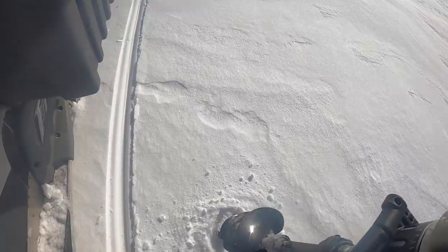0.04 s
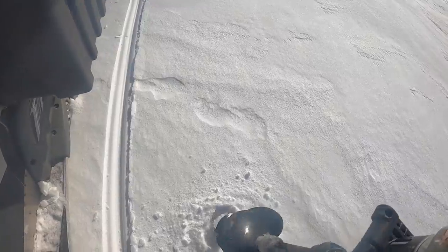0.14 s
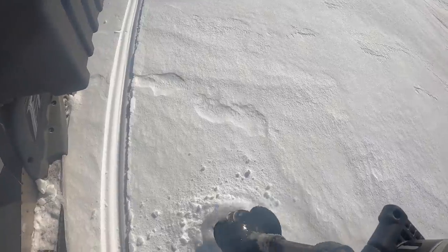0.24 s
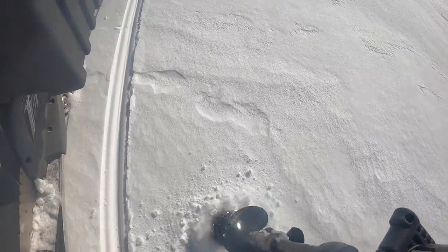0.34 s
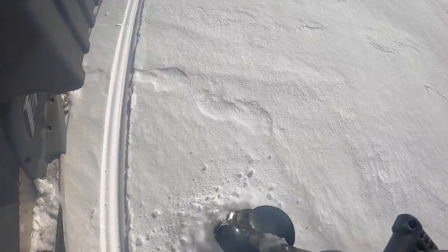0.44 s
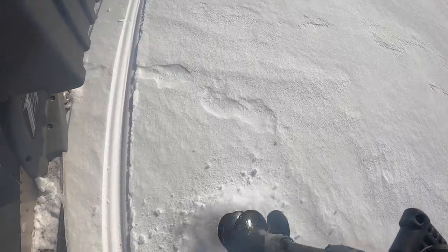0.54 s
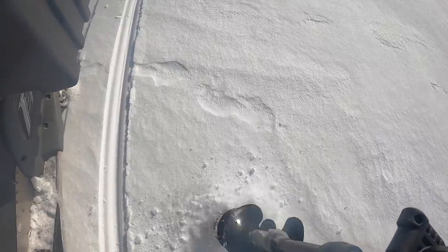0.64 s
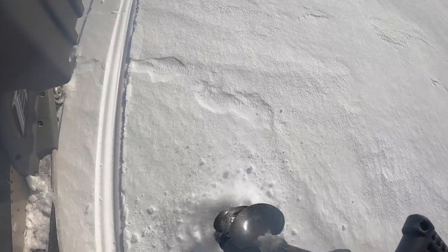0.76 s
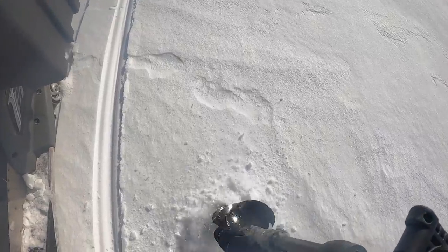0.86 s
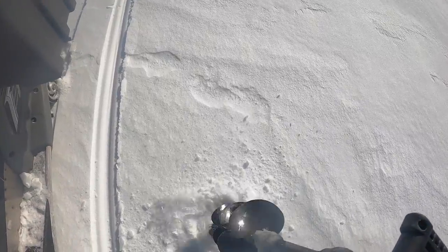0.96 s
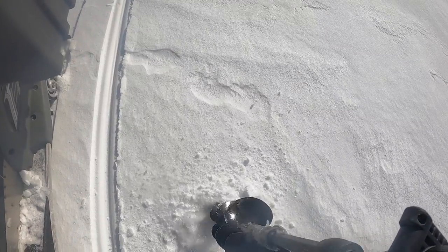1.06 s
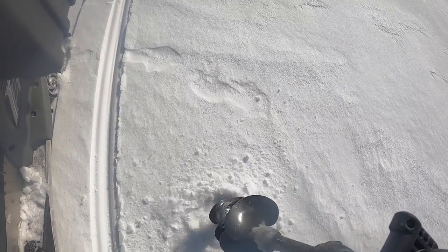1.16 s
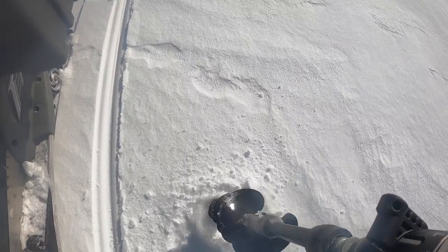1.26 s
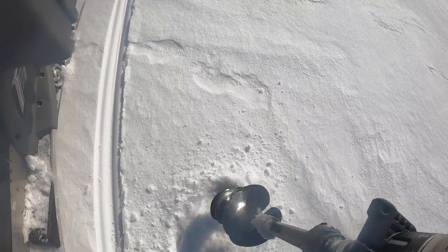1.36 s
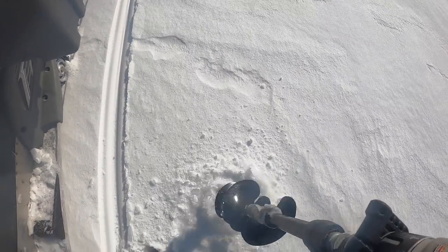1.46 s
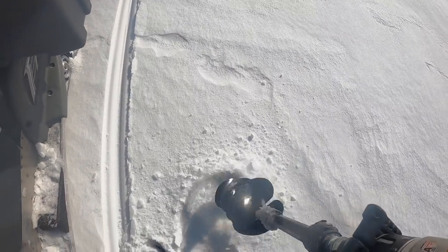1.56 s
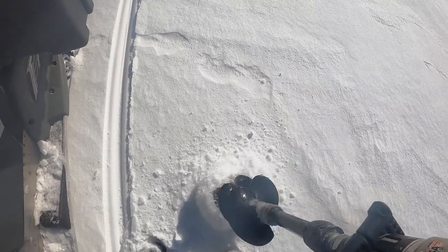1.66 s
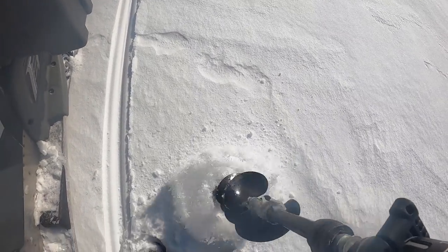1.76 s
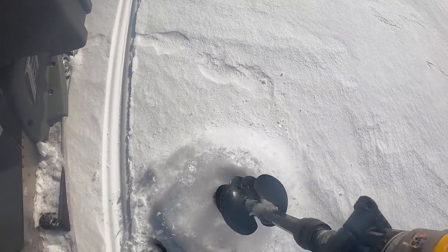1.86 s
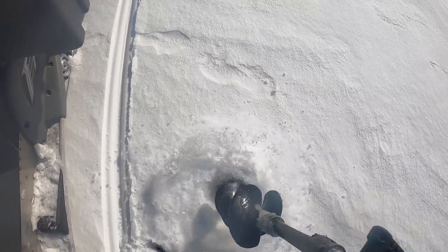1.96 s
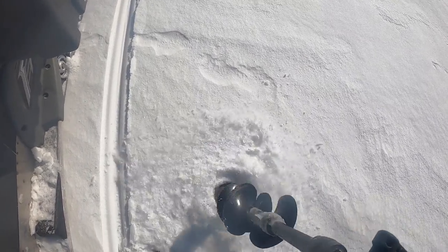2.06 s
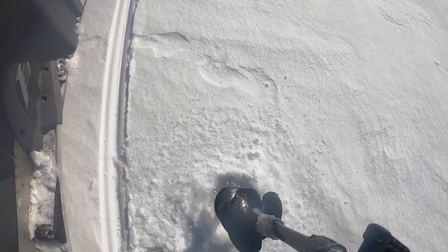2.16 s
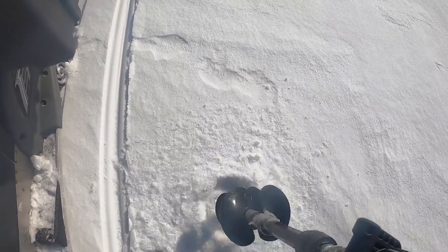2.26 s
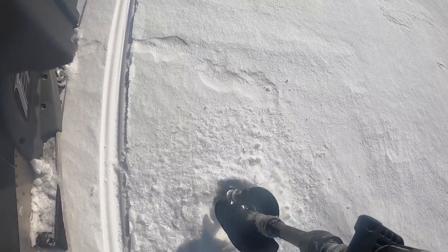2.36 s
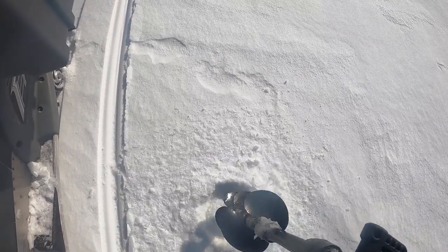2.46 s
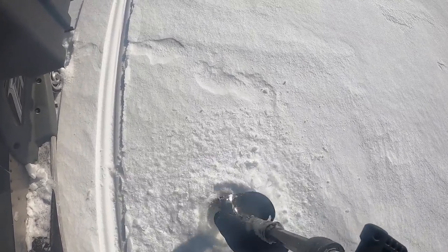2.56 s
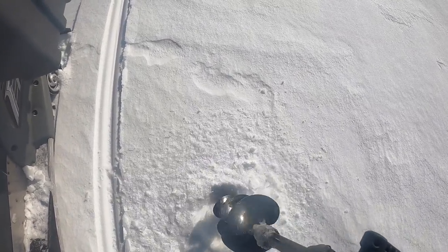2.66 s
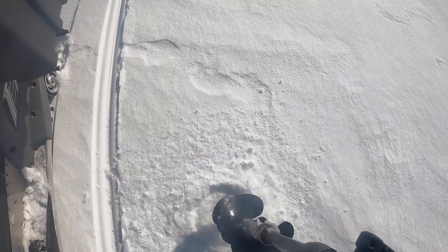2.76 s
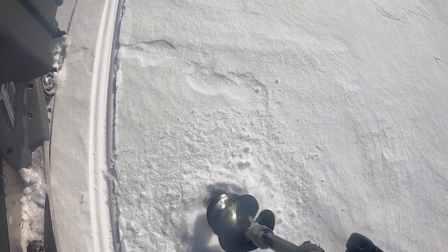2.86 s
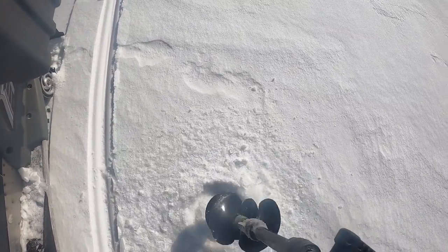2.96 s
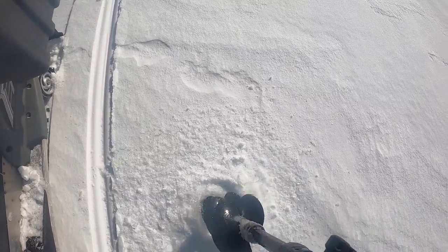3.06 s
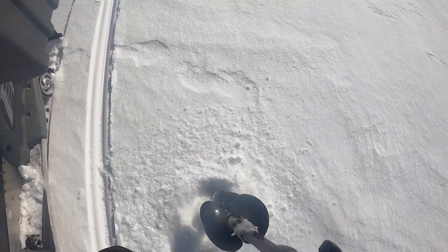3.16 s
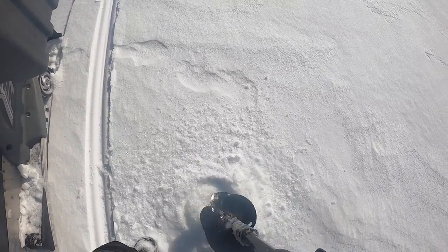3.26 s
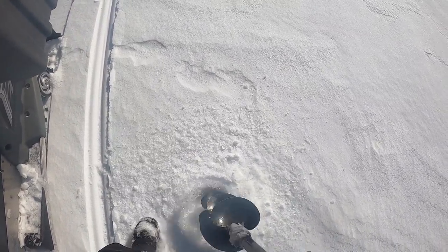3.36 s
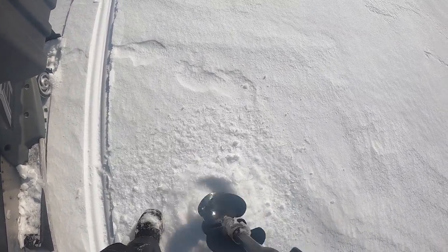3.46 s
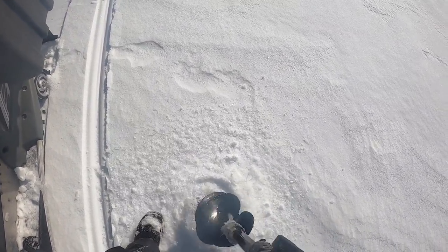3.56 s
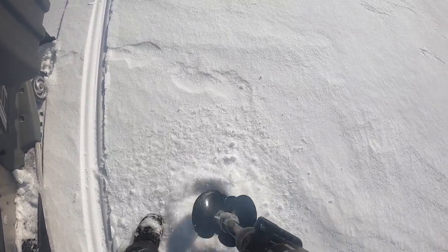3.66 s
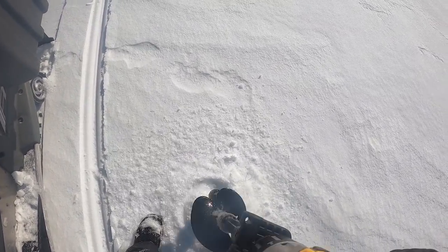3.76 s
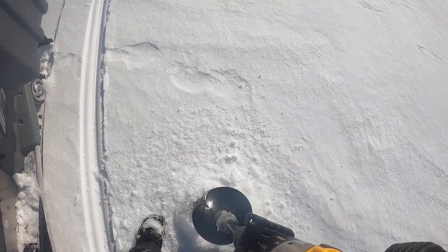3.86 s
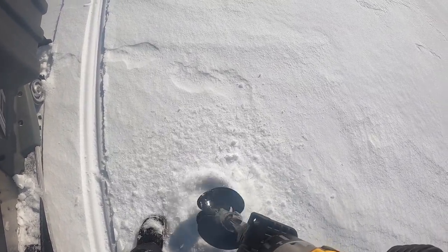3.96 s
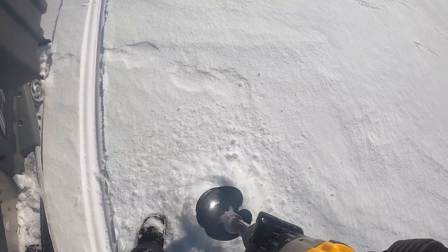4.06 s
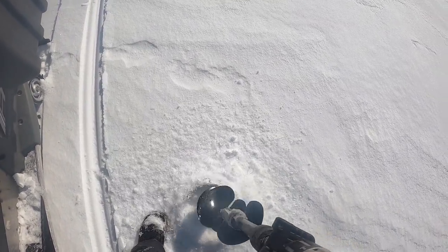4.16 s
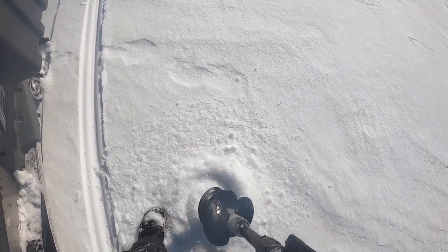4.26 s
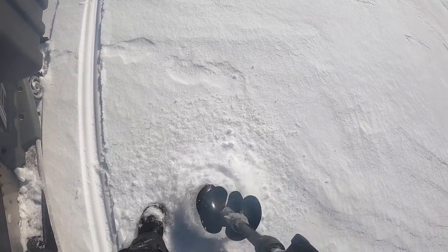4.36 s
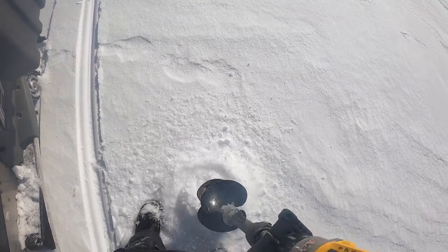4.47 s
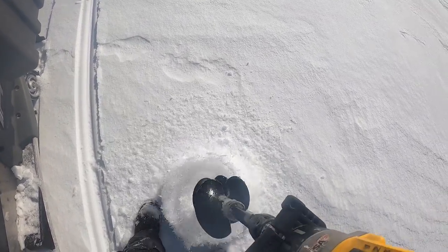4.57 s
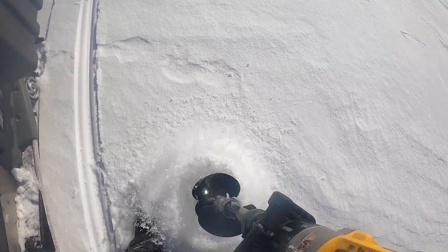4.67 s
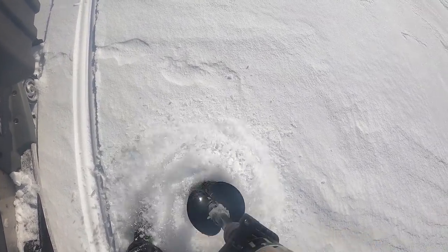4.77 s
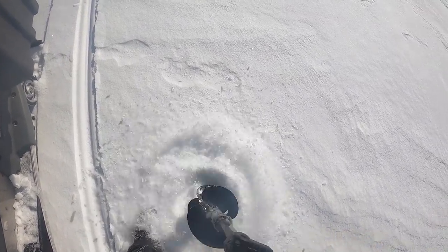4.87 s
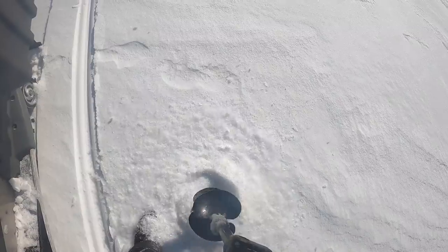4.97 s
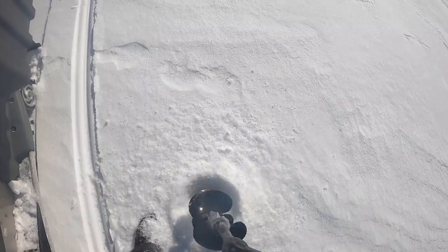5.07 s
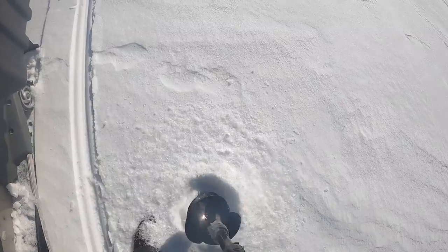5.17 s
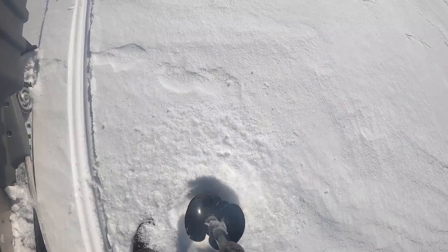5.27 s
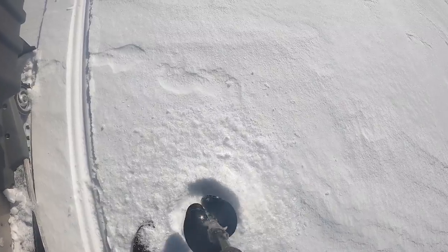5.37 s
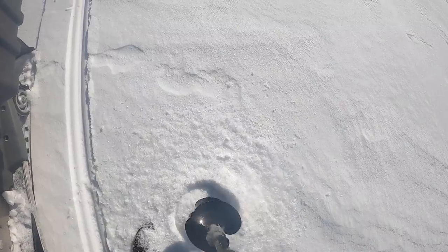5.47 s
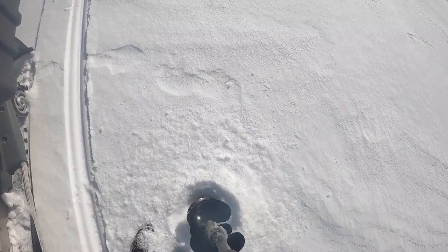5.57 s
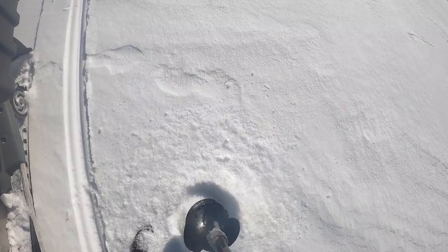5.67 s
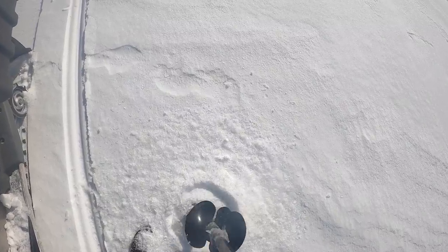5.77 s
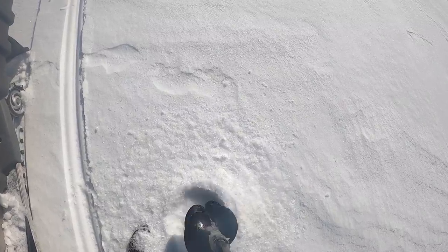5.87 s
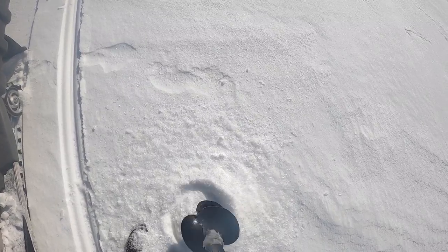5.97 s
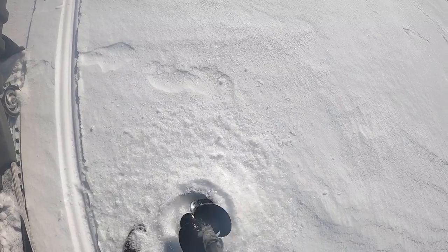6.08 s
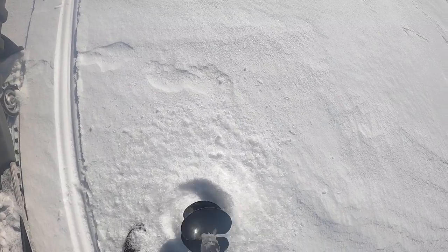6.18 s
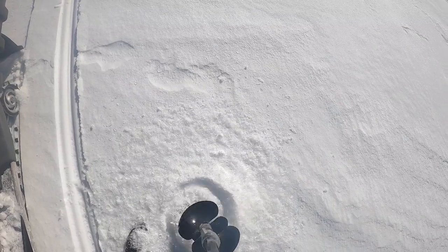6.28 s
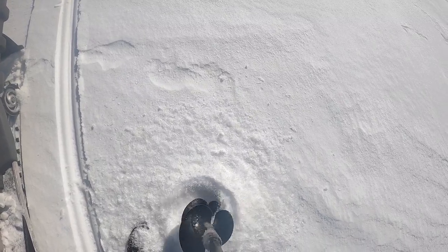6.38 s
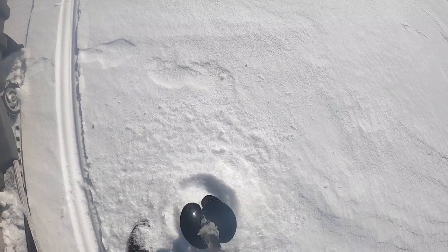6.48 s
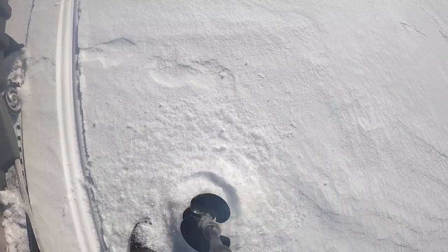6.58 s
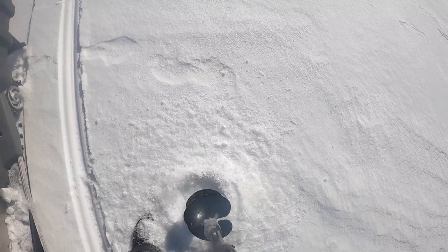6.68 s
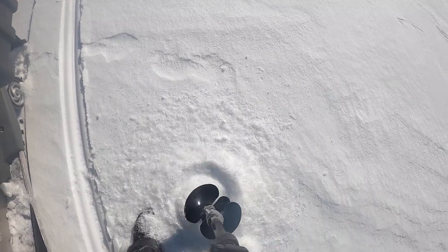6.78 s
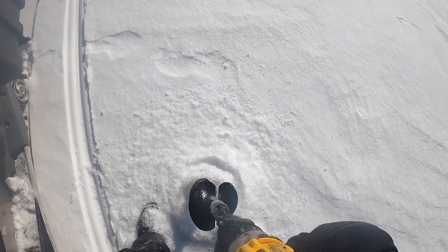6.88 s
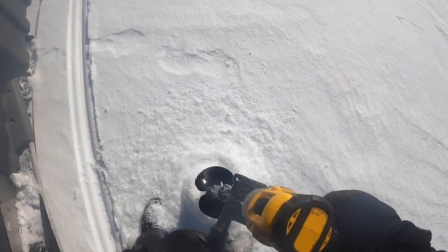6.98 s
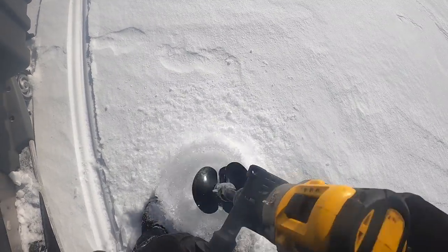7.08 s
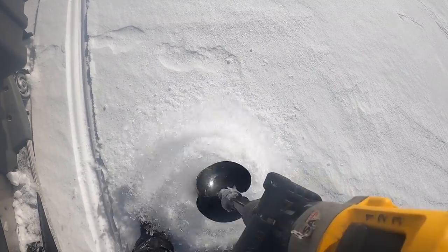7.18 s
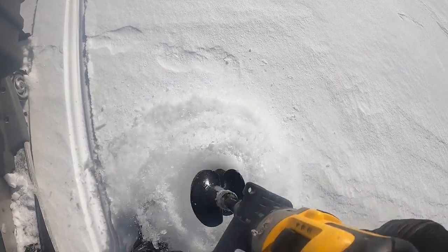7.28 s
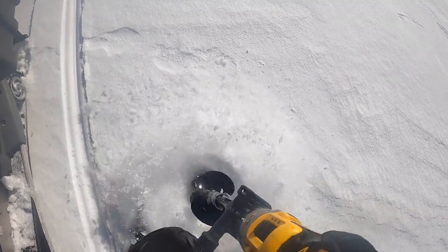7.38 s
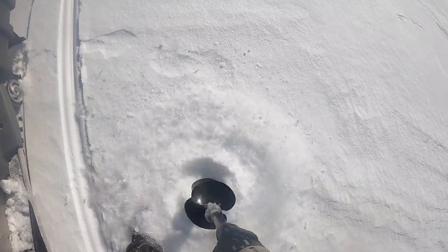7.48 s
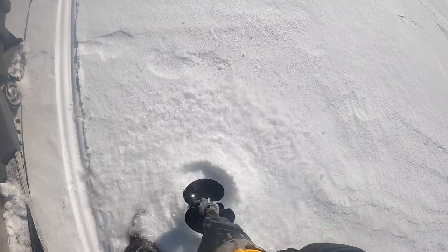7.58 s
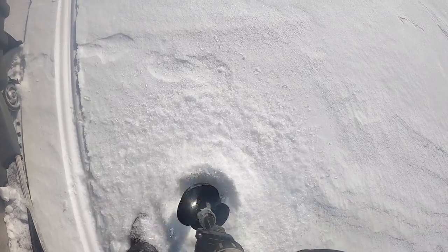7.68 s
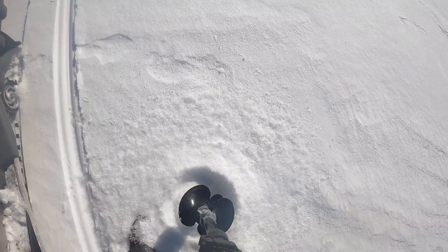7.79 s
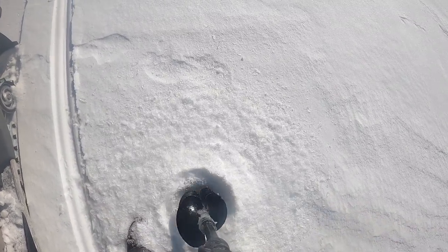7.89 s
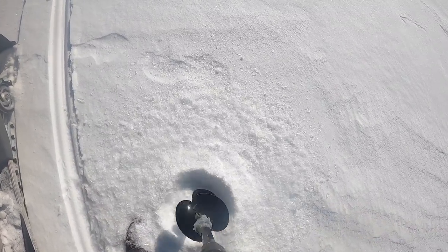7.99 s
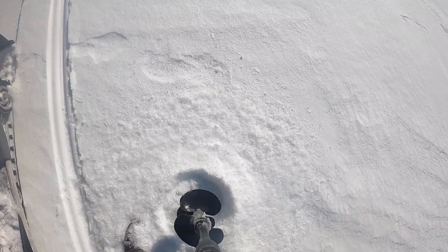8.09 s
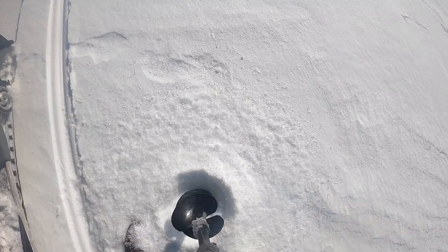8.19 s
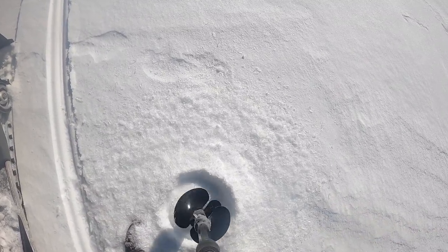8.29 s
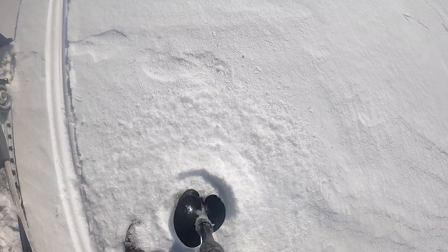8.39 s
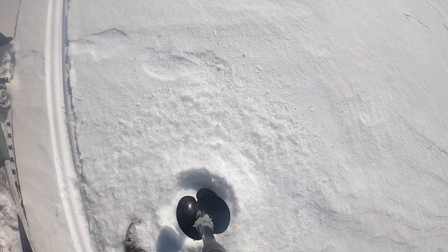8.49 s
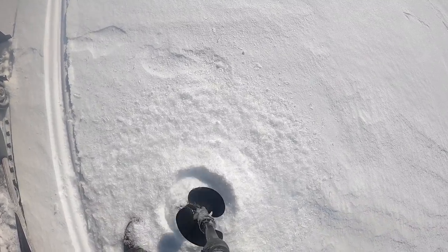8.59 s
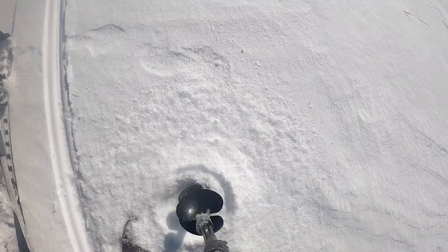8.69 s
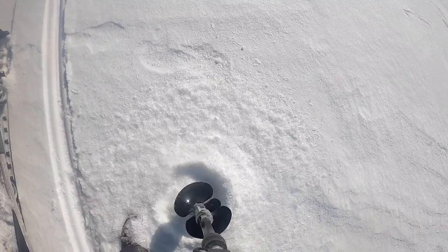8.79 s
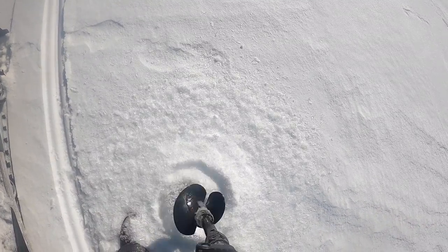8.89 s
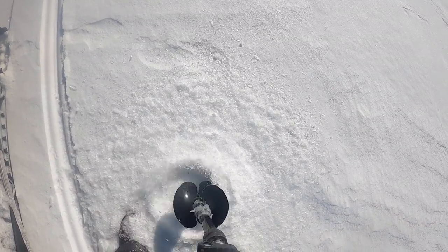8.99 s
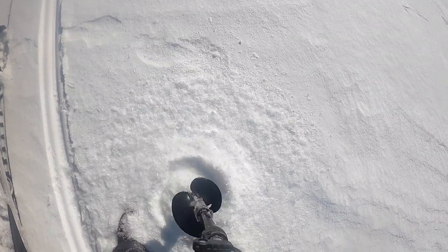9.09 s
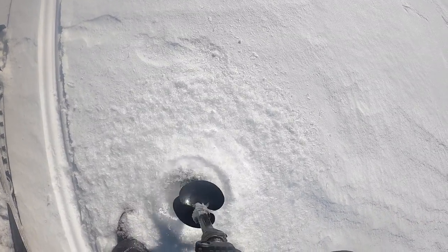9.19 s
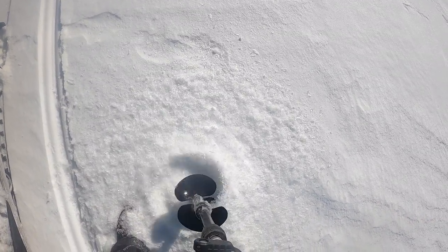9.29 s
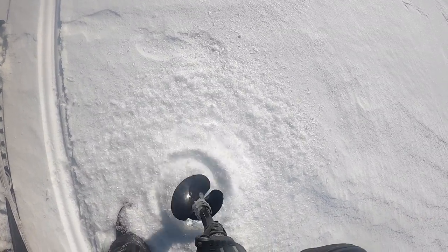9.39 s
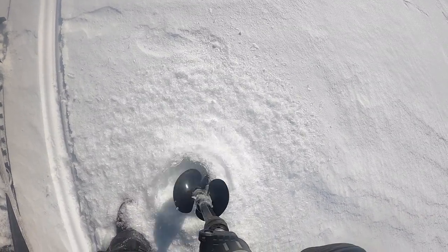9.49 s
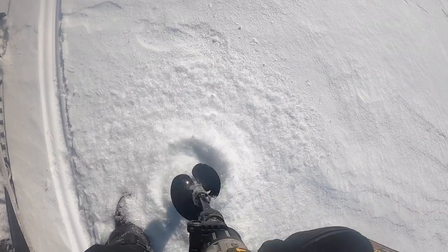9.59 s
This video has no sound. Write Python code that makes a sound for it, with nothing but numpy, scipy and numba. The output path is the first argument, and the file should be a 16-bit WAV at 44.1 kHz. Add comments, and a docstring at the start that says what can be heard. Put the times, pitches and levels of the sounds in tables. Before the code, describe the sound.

A gust of wind and small metal clacks, then a cordless drill surges up close, whining and rattling as its auger grinds into lake ice.

```python
"""A gust of wind and small metal clacks come first, then a cordless drill surges up close by and augers into lake ice.
Its gear tones whine over a rattling housing, sag under load and jump whenever the blades slip.
Three times the auger is lifted and spins free. Grains of noise make scraping blades and wet slush;
decaying sines make thuds and chuck clacks, and filtered noise makes the wind."""
import sys
import numpy as np
from scipy import signal
from scipy.fft import rfft
from scipy.io import wavfile
from scipy.ndimage import uniform_filter1d, map_coordinates
from numba import njit

SR = 44100
rng = np.random.default_rng(int(sys.argv[2]) if len(sys.argv) > 2 else 0)


def wav_out(sig):
    """Save sig, one row per channel (or a flat mono array), as 16-bit PCM at SR to the path in sys.argv[1]."""
    wavfile.write(sys.argv[1], SR, np.round(np.clip(np.atleast_2d(sig).T, -1, 1) * 32767).astype(np.int16))


N = 425124
T = np.arange(N) / SR
# the motor starts, then the shaft engages; free-running speed in motor turns per second
START_S, ENGAGE_S, FREE_HZ = 0.22, 0.268, 510.6


def undb(db):
    """Decibels to gain."""
    return 10 ** (np.asarray(db) / 20)


def unit(x):
    """Scale to rms 1."""
    return x / np.sqrt(np.mean(x ** 2))


def curves(table):
    """Each column of a table as a control over time."""
    s, *columns = np.transpose(table)
    return [np.interp(T, s, column) for column in columns]


def ramp(s, rise_s):
    """A smooth step from 0 to 1 around time s."""
    return (1 + np.tanh((T - s) / (2 * rise_s))) / 2


def walk(rate):
    """Smooth chance of rms 1 that changes about rate times a second."""
    k = max(int(SR / rate), 1)
    smooth = uniform_filter1d(rng.standard_normal(N), k)
    return unit(uniform_filter1d(smooth, k))


def grains(rate, scatter_db):
    """Dense tiny impacts of uneven size, rate of them a second."""
    hits = rng.random(N) < rate / SR
    signs = np.sign(rng.standard_normal(N))
    sizes = undb(scatter_db * rng.standard_normal(N))
    return unit(hits * signs * sizes)


def shape(x, points):
    """Filter by an outline of (frequency [Hz], level [dB])."""
    hz, db = np.transpose(points)
    f = np.fft.rfftfreq(N, 1 / SR) + 1
    gain = undb(np.interp(np.log(f), np.log(hz), db))
    return np.fft.irfft(np.fft.rfft(x) * gain, N)


@njit
def band(x, hz, width):
    """State-variable band-pass whose centre may move."""
    y, b, l = np.empty(len(x)), 0., 0.
    for i in range(len(x)):
        w = np.pi * hz[i] / SR
        g = np.tan(w)
        k = width / hz[i] * 2 * w / np.sin(2 * w)
        v = (b + g * (x[i] - l)) / (1 + g * (g + k))
        b, l, y[i] = 2 * v - b, l + 2 * g * v, k * v
    return y


def fixed_band(x, hz, width):
    """Band-pass with a centre that stays put."""
    return band(x, np.full(len(x), float(hz)), float(width))


# wind gusts: (time [s], rise [dB], half length [s])
WIND_GUSTS = [(0.077, 7.5, 0.13), (1.202, 3.5, 0.17), (2.7, 4, .22)]
# colour of the wind on the microphone: (frequency [Hz], relative level [dB])
WIND_COLOUR = [(15, -2), (48, -6), (80, -17.5), (140, -23), (300, -28.5), (1000, -33.5), (3400, -31),
               (4500, -37), (16000, -55)]


def wind(db=-36.0, buffet_db=2):
    """Low buffeting with a faint hiss, from shaped noise that swells in a few gusts."""
    gust_db = sum(rise_db * np.exp(-((T - s) / half_s) ** 2) for s, rise_db, half_s in WIND_GUSTS)
    noise = unit(shape(rng.standard_normal(N), WIND_COLOUR))
    return noise * undb(db + gust_db + buffet_db * walk(21.0))


# slush and chips landing: (time [s], relative level [dB], centre [Hz], decay [s])
SPLATS = [(1.925, -19.5, 890, 0.0097), (1.967, -17.5, 804.6, 0.017), (4.662, -22, 194, 0.01),
          (4.79, -22.5, 191, 0.055), (4.808, -10, 786, 0.012), (5.06, -19, 370, 0.013),
          (5.314, -18, 420, 0.0095), (5.58, -24.5, 328, 0.011), (7.18, -22.5, 130, 0.014),
          (7.395, -21.5, 191, 0.054), (7.398, -10, 676, .007), (7.418, -18, 720, 0.026),
          (7.447, -15, 710, .018), (8.173, -20, 260, 0.0088)]


def slush(spread=1.77, attack_s=0.0029):
    """Slush lands as wet splats: short bursts of grains, each in a broad band."""
    out, spray = np.zeros(N), grains(rate=3200, scatter_db=3.0)
    age = T[:SR // 7]
    envelope_rise = 1 - np.exp(-age / attack_s)
    for s, db, hz, decay_s in SPLATS:
        span = slice(int(s * SR), int(s * SR) + len(age))
        width = spread * hz
        splat = unit(fixed_band(fixed_band(spray[span], hz, width), hz, width))
        out[span] += undb(db) * 2 * splat * envelope_rise * np.exp(-age / decay_s)
    return out


# lumps thudding close to the microphone: (time [s], level [dB], frequency [Hz], decay [s])
LUMPS = [(1.976, -15, 60, 0.014), (4.839, -6, 116, 0.0086), (7.496, -12, 66.3, 0.011),
         (9.46, -17, 90.2, 0.012)]


def thuds():
    """Heavy lumps land as short low sines that die away."""
    out, age = np.zeros(N), T[:SR // 7]
    for s, db, hz, decay_s in LUMPS:
        start = int(s * SR)
        out[start:start + len(age)] += undb(db) * np.sin(2 * np.pi * hz * age) * np.exp(-age / decay_s)
    return out


# pushes into the ice: (blades bite [s], auger lifted [s], loaded speed [motor turns/s], time to sag [s],
# first slip [s], time between slips [s], typical leap at a slip [motor turns/s], gearbox level [dB],
# vent level [dB], fifth gear order against sixth [dB], whine level [dB], scraping level [dB])
PUSHES = [(.54, 1.649, 321.6, .16, 1, .121, 36, -6, -3, -3, -1, -23),
          (1.985, 4.499, 342.2, .055, 2.19, .122, 29.97, -2, -3, -2, .5, -24.5),
          (4.83, 7.02, 324.3, .035, 4.991, .1242, 53.97, 2, -4, 1, 0, -25.5),
          (7.485, 9.8, 335.1, .036, 7.634, .1215, 23, 2, -2.5, -1, -0.9, -26)]


def per_push():
    """Loaded speed, gearbox, vents, order balance, whine, scraping: held in a push, gliding between."""
    pushes = np.array(PUSHES)
    edges_s = pushes[:, :2].ravel()
    columns = (pushes[:, 2], *pushes[:, 7:].T)
    return [np.interp(T, edges_s, np.repeat(column, 2)) for column in columns]


def blade_load(creep_share=0.2, creep_s=0.25, release_s=0.019):
    """Load on the motor, 0-1: it builds as the blades bite and drops when the auger is lifted."""
    load = 0
    for bite_s, lift_s, _, sag_s, *_ in PUSHES:
        age = np.maximum(T - bite_s, 0)
        # the last share of the sag creeps in as the blades dig deeper
        grip = 1 - (1 - creep_share) * np.exp(-age / sag_s) - creep_share * np.exp(-age / creep_s)
        load = load + grip * (1 - ramp(lift_s, release_s))
    return np.clip(load, 0, 1)


def churn(load, cut_s, db=-36, hz=150, width_hz=170, full_after_s=3.8, patchy_db=4):
    """Lifted out of a deep hole, the spiral tumbles loose slush: low, lumpy, band-passed grains."""
    fill = np.minimum(cut_s / full_after_s, 1) * (1 - load) ** 2
    tumble = unit(fixed_band(grains(rate=500, scatter_db=1.5), hz, width_hz))
    return tumble * fill * undb(db + patchy_db * walk(30))


# colour of blades scraping ice: (frequency [Hz], relative level [dB])
SCRAPE_COLOUR = [(40, 2), (100, 3.5), (150, -3.5), (310, -5.5), (420, 0), (560, -1.5), (760, -0.5),
                 (1100, 1.5), (1400, -3), (2000, -1.5), (3200, -14), (8000, -14)]


def blades(load, cut_s, boom_hz=190, boom_width_hz=40, boom_db=-29.5, fade_db_per_s=1.12,
           boom_lifted_db=-11.5, patchy_db=1.8, attack_s=0.018, shallow_db=-1.0, deep_db=2.5, deep_after_s=5.9):
    """Ice chips off in dense grains that boom in the auger's spiral, less with every second of cutting."""
    scrape_db = per_push()[-1]
    # the lifted auger scrapes a little less over a shallow hole but rubs the wall of a deep one
    lifted_db = np.interp(cut_s, [0, deep_after_s], [shallow_db, deep_db])
    scrape = unit(shape(grains(rate=2500, scatter_db=3), SCRAPE_COLOUR))
    scrape = scrape * undb(scrape_db + lifted_db * (1 - load))
    boom = unit(fixed_band(grains(rate=900, scatter_db=1), boom_hz, boom_width_hz))
    boom = boom * undb(boom_db - fade_db_per_s * cut_s + boom_lifted_db * (1 - load))
    patches = undb(patchy_db * walk(26))
    return (scrape + boom) * patches * ramp(ENGAGE_S - attack_s, attack_s)


# the chuck takes up its slack: (time [s], relative level [dB])
CHUCK_HITS = [(.195, -26), (0.228, -18), (0.2455, 4), (4.841, -4.5), (7.4, -7)]
# what the struck chuck rings with: (frequency [Hz], relative level [dB], decay [s])
CHUCK_MODES = [(1025, -14.5, 0.011), (2080, -3.5, 0.0039), (4020, -3, .004), (5600, -8, .003),
               (7050, -21, 0.0017), (7400, -15, .003), (8600, -5, 0.0034), (11900, -10, 0.0024)]


def chuck(crack_db=-7, crack_s=0.0083, db=-2):
    """Slack metal clacks together: decaying modes under a short crack of noise."""
    out, age = np.zeros(N), T[:SR // 15]
    ring = 0
    for hz, mode_db, decay_s in CHUCK_MODES:
        ring = ring + undb(mode_db) * np.sin(2 * np.pi * hz * age) * np.exp(-age / decay_s)
    for s, hit_db in CHUCK_HITS:
        start = int(s * SR)
        crack = undb(crack_db) * rng.standard_normal(len(age)) * np.exp(-age / crack_s)
        out[start:start + len(age)] += undb(db + hit_db) * (ring + crack)
    return out


def squeak(start_s=0.273, length_s=0.021, hz=2600, db=-13):
    """The drive squeaks briefly as it takes hold: one sine under a half-sine swell."""
    swell = np.sin(np.pi * np.clip((T - start_s) / length_s, 0, 1))
    return undb(db) * swell * np.sin(2 * np.pi * hz * T)


def motor_speed(load, loaded_hz, steady, idle_hz=410, rise_s=.008, fall_s=.019, uneven=.2,
                waver_hz=2.2, wobble_hz=14, free_waver_hz=6):
    """The motor sags under load, leaps as the blades slip, and wavers; also how freely it runs, 0-1."""
    hz = idle_hz + (FREE_HZ - idle_hz) * ramp(ENGAGE_S + fall_s, rise_s) - (FREE_HZ - loaded_hz) * load
    free = np.clip((hz - 370) / 135, 0, 1) ** 1.512
    for _, lift_s, _, _, first_s, turn_s, leap_hz, *_ in PUSHES:
        slips = np.arange(first_s, lift_s, turn_s)  # once an auger turn
        for s, chance in zip(slips, rng.standard_normal(len(slips))):
            near = slice(int((s - .1) * SR), int((s + .2) * SR))
            age = T[near] - s
            side_s = np.where(age < 0, rise_s, fall_s)
            hz[near] += leap_hz * (1 + uneven * chance) * np.exp(-np.abs(age / side_s) ** 1.5)
    shake_hz = waver_hz + wobble_hz * (1 - steady) * (1 - free / 2)
    return hz + shake_hz * walk(64.94) + free_waver_hz * free * walk(14), free


# gear tones: (multiple of motor speed, relative level under load [dB],
# relative level running free [dB], roughness [0-1])
GEAR_TONES = [(2.49, -21.5, -30, 0.57), (2.994, -9, -13.5, 0.77), (3.65, -30, -17.5, 0.94),
              (4.973, -9, -46, 0.65), (6.01, -10, -13.5, 0.76), (7.46, -14, -24, 0.94),
              (10.01, -17.5, -26, 0.93), (11.89, -16, -14.5, 0.92), (14.91, -6.8, -30, 0.8),
              (16.75, -12.5, -36, 1), (17.54, -19, -13.5, 0.97), (20.13, -13.5, -24, 1),
              (24.53, -19.5, -14, 0.98), (34.2, -25, -36, 0.7)]


def whine(turns, hz, free, steady, balance_db, smear_hz=80, loose_db=-3, hum_db=-6.0,
          shell_hz=2600, shell_width_hz=260, shell_db=5.0, flicker_db=0.23, buzz_db=4, chatter_db=9,
          settle_s=.5, dull_db=-2.5, case_hz=5150, case_width_hz=220, off_case_db=-9):
    """Gear teeth mesh at multiples of the motor speed; backlash smears each tone, steadiness firms it up."""
    loose = 1 - steady
    # the sixth order flares as it sweeps through a resonance of the shell
    flare_db = shell_db / (1 + ((6 * hz - shell_hz) / shell_width_hz) ** 2)
    # the fifteenth sings only near a resonance of the gear case
    sing_db = off_case_db * (1 - 1 / (1 + ((15 * hz - case_hz) / case_width_hz) ** 2))
    # level changes by nearest whole order, under load
    load_extra_db = {3: hum_db * loose, 5: balance_db, 6: flare_db - 1.2 * balance_db,
                     12: buzz_db * loose, 15: sing_db}
    # running free, the fourth chatters just after the start; three others are dull until steadied
    free_extra_db = {4: chatter_db * np.exp(-(T / (ENGAGE_S + settle_s)) ** 4)}
    free_extra_db.update(dict.fromkeys((6, 12, 25), dull_db * loose))
    out = 0
    for multiple, load_db, free_db, rough in GEAR_TONES:
        order = round(multiple)
        rough = np.clip(rough, 0, 1)
        phase = 2 * np.pi * multiple * turns
        smear = smear_hz * (1 + rough * multiple / 10)
        in_phase = np.sqrt(2 - 2 * rough ** 2) + rough * walk(smear)
        tone = in_phase * np.sin(phase) + rough * walk(smear) * np.cos(phase)
        # the higher the order, the more it comes and goes in short squeals
        squeal = unit(undb(flicker_db * multiple * np.minimum(walk(32), 2)))
        # loaded and free-running levels cross-fade as the motor speeds up
        loaded_db = load_db + load_extra_db.get(order, 0) + loose_db * loose
        lifted_db = free_db + free_extra_db.get(order, 0)
        out = out + tone * squeal * undb(loaded_db * (1 - free) + lifted_db * free)
    return out


# resonances of the drill: (centre [Hz], width [Hz], relative level under load [dB],
# relative level running free [dB], side [0 body, 1 gearbox, 2 vents])
HOUSING_MODES = [(2260, 1350, -8.5, -10, 0), (4030, 960, -8, -5.5, 0), (5396, 970, -6, -6, 1),
                 (6684, 450, -14, -23, 0), (7690, 1040, -10.5, -6.5, 2), (8860, 1160, -7.5, -1.5, 2),
                 (10290, 640, -12, -5.5, 2), (12140, 1000, -15, -6.5, 2), (12900, 6700, -11, -7.5, 2)]


def rattle(turns, free, shifts, gearbox_db, vent_db, throb=0.084):
    """Tooth impacts, bunched once a motor turn, ring the housing; tilting the drill shifts its colour."""
    sides_db = [0, gearbox_db, vent_db]
    bunching = 1 + throb * np.sin(2 * np.pi * turns)
    out, power = 0, 0
    for hz, width_hz, load_db, free_db, side in HOUSING_MODES:
        side = round(side)
        centre, width = hz * shifts[side], float(width_hz)
        impacts = grains(rate=14000, scatter_db=-1.0) * bunching
        ring = unit(band(band(impacts, centre, width), centre, width))
        gain = undb(load_db * (1 - free) + free_db * free + sides_db[side])
        out, power = out + gain * ring, power + gain ** 2
    return out / np.sqrt(power)


def glance(x, shift, notch_hz=1560, share=0.18):
    """A second path around the drill's body cuts evenly spaced notches that move with the tilt."""
    late = map_coordinates(x, [np.arange(N) - SR / (notch_hz * shift)], order=3)
    return unit(x - share * late)


def jolts(rate=70, decay_s=0.034):
    """Random jolts throughout: sudden rises that die away, with the slow drift removed and rms 1."""
    keep = np.exp(-1 / (decay_s * SR))
    kicks = signal.lfilter([1], [1, -keep], rng.random(N) < rate / SR)
    return unit(kicks - uniform_filter1d(kicks, SR // 22))


def effort(free, loaded_db=-19, free_db=-19, idle_db=-27.5, surge_db=5.5, surge_s=0.36,
           start_s=0.0057, engage_s=0.0034):
    """Gain of the drill: quiet until the shaft engages, then a surge that settles to an even level."""
    surge = surge_db * np.exp(-np.maximum(T - ENGAGE_S, 0) / surge_s)
    working = undb(loaded_db * (1 - free) + free_db * free + surge)
    engaged = ramp(ENGAGE_S, engage_s)
    return undb(idle_db) * ramp(START_S, start_s) * (1 - engaged) + working * engaged


# tilt of the drill in the hands shifts its resonances:
# (time [s], factor for body and gearbox [ratio], factor for the vents [ratio])
HAND_TILT = [(.3, 1.0, 0.99), (1.2, .95, 0.94), (1.9, 1.006, 1.02), (2.3, .95, 0.91), (3.5, 1.022, 1.06),
             (3.75, 1.21, 1.21), (4.3, 1.14, 1.12), (5.0, 1.05, 1.04), (5.6, 1.056, 1.08),
             (6.15, 0.96, 0.99), (7.0, 1.11, 1.05), (7.4, 1.04, 0.98), (8.4, 1.02, 0.98), (9.0, 1.1, 1.03),
             (9.64, 1.054, 1.0)]


def drill(load, cut_s, steady_max=0.84, steady_after_s=2.0, rattle_db=0.3, jolt_db=0.83,
          free_gearbox_db=0, free_vent_db=-5.5, vent_rise_db=4):
    """Gear whine and housing rattle share one motor; running free, the vents brighten over a deep hole."""
    loaded_hz, gearbox_db, vent_db, balance_db, whine_db, _ = per_push()
    # the deepening hole steadies the auger, 0-1
    steady = np.clip(steady_max * (1 - np.exp(-(cut_s / steady_after_s) ** 2)), 0, 1)
    hz, free = motor_speed(load, loaded_hz, steady)
    turns = np.cumsum(hz) / SR
    shift, vent_shift = curves(HAND_TILT)
    gearbox_db = gearbox_db * (1 - free) + free_gearbox_db * free
    vent_db = vent_db * (1 - free) + (free_vent_db + vent_rise_db * steady) * free
    housing = glance(rattle(turns, free, [shift, shift, vent_shift], gearbox_db, vent_db), shift)
    gears = undb(whine_db) * whine(turns, hz, free, steady, balance_db)
    return (gears + undb(rattle_db) * housing) * effort(free) * undb(jolt_db * jolts())


def scene(side_db=-44):
    """Open ice gives no echo; all sits in the middle, and a very faint noise-smeared copy parts left and right."""
    load = blade_load()
    cut_s = np.cumsum(load) / SR  # seconds spent cutting: the depth of the hole
    mid = wind() + slush() + thuds() + churn(load, cut_s) + blades(load, cut_s)
    mid = mid + chuck() + squeak() + drill(load, cut_s)
    smear = rng.standard_normal(SR // 30)
    smear = smear / np.linalg.norm(smear)
    # the smeared copy is added on the left and subtracted on the right
    side = undb(side_db) * signal.fftconvolve(mid, smear)[:N]
    return np.array([mid + side, mid - side])


def record(dry, limit_db=-15.0, memory_s=0.033, top_hz=15900):
    """The level ducks after loud blows, peaks clip at full scale and the top treble is cut."""
    keep = np.exp(-1 / (memory_s * SR))
    power = signal.lfilter([1 - keep], [1, -keep], dry[0] ** 2)  # one running level steers both channels
    held = dry / np.maximum(np.sqrt(power) / undb(limit_db), 1)
    low_pass = signal.ellip(10, .2, 80, top_hz, fs=SR, output="sos")
    return signal.sosfilt(low_pass, np.clip(held, -1, 1))


dry = scene()
out = record(dry)
wav_out(out)
```